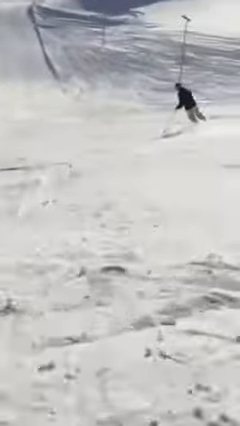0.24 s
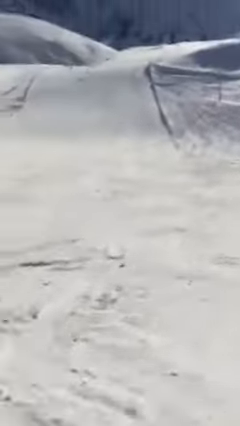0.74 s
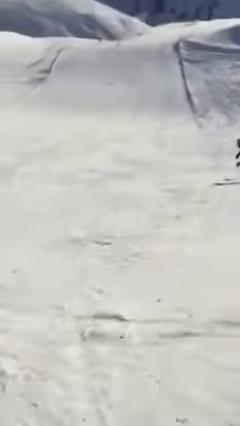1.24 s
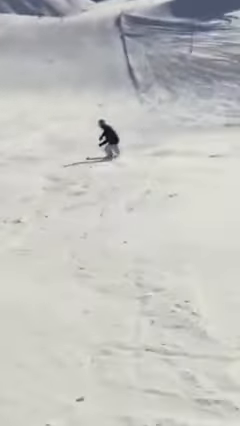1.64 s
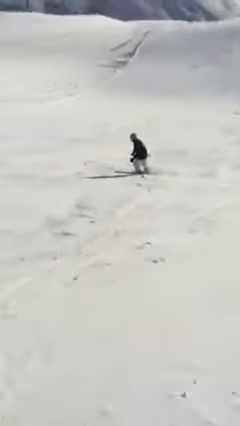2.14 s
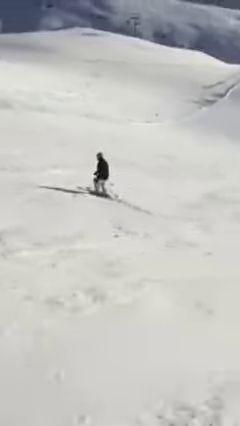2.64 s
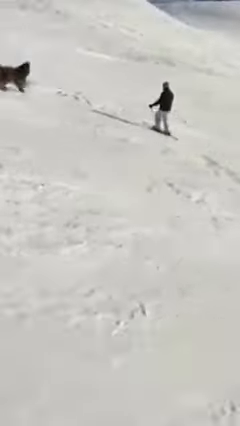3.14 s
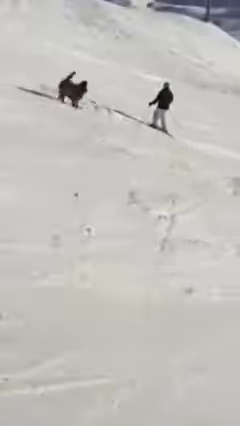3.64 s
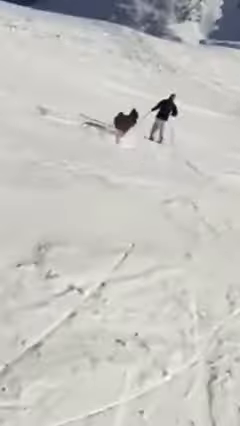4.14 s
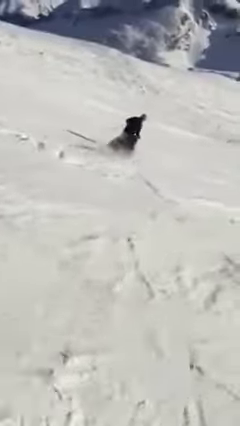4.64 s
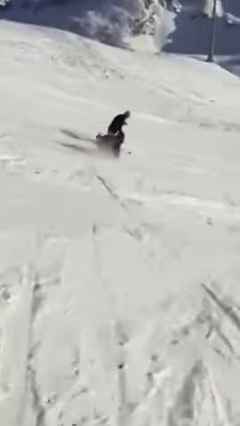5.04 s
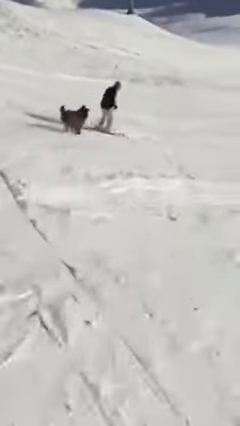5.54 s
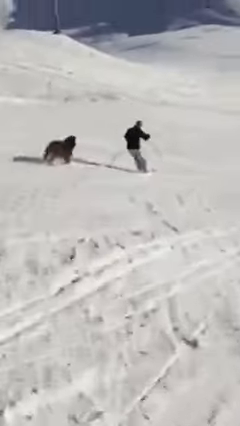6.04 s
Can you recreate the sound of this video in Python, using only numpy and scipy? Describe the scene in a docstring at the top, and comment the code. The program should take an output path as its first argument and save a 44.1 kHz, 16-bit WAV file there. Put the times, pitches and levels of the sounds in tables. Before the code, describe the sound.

Skis glide down a packed snow slope, their edges scraping through uneven turns with a gritty rasp and a hiss of thrown snow. The skis clack together sharply about a second in, and one slaps down dully near the middle. The scraping then grows stronger before easing. Low wind gusts buffet the moving skier's phone microphone, mostly at the start and near the end.

```python
"""Skiing on packed snow.

A skier, phone in hand, turns and skids down a piste. The edges crush grains and ring the skis,
loose snow sprays, the bases drum over ruts. Wind buffets the single microphone in gusts.
The skis clack together at 1.1 s; one ski slaps down at 2.9 s."""
import sys
import numpy as np
from scipy import signal
from scipy.fft import rfft, irfft, next_fast_len
from scipy.io import wavfile
from scipy.ndimage import uniform_filter1d

SR = 44100
rng = np.random.default_rng(int(sys.argv[2]) if len(sys.argv) > 2 else 0)


def bounce(signal):
    """Save signal as a 16-bit WAV file at the path given by the first command-line argument."""
    frames = np.transpose(np.atleast_2d(signal))
    limited = np.clip(frames, -1, 1)
    pcm = np.round(limited * 32767).astype(np.int16)
    wavfile.write(sys.argv[1], SR, pcm)


N = 276948
TIME = np.arange(N) / SR

# Resonances of skis and boots. Each row: centre in Hz, width in Hz, added peak in dB.
SKI_RESONANCES = [(320, 120, -22.5), (912, 160, -6.5), (1440, 88, -7.5), (2522, 43, -7), (4000, 65, -11.5),
                  (8760, 770, -18)]


def undb(db):
    """Decibels to gain."""
    return np.exp(np.asarray(db) * (np.log(10) / 20))


def unit(x):
    """Scale to rms 1."""
    return x / np.sqrt(np.mean(x ** 2))


def curve(points):
    """Per-sample curve through (seconds, value) points, corners rounded."""
    return uniform_filter1d(np.interp(TIME, *np.transpose(points)), size=600)


def walk(per_s):
    """Random levels joined by straight lines."""
    return np.interp(TIME * per_s, np.arange(N // 10), rng.standard_normal(N // 10))


def swell(start_s, end_s, rise_s, fall_s):
    """Envelope: smooth rise, hold, exponential fall."""
    rise = np.sin(np.pi / 2 * np.clip((TIME - start_s) / rise_s, 0, 1))
    return rise * np.exp(-np.maximum(TIME - end_s, 0) / fall_s)


def bursts(blows, rise_s):
    """Envelope of blows that rise fast and die away."""
    envelope = np.zeros(N)
    for start_s, db, decay_s in blows:
        start = int(start_s * SR)
        age = TIME[:min(N - start, SR // 2)]
        envelope[start:start + len(age)] += undb(db) * (1 - np.exp(-age / rise_s)) * np.exp(-age / decay_s)
    return envelope


def colour(x, spectrum, resonances=()):
    """Minimum-phase filter of unit power gain: smooth spectrum with resonant peaks."""
    size = 2 * next_fast_len(N)
    bin_hz = np.maximum(np.arange(size // 2 + 1) * SR / size, 1)
    hz, db = np.transpose(spectrum)
    gain = undb(np.interp(np.log(bin_hz), np.log(hz), db))
    for centre_hz, width_hz, peak_db in resonances:
        gain *= 1 + undb(peak_db) / (1 + (2 * (bin_hz - centre_hz) / width_hz) ** 2)
    cepstrum = irfft(np.log(unit(gain)))
    cepstrum[1:size // 2] *= 2
    cepstrum[size // 2 + 1:] = 0
    return irfft(rfft(x, size) * np.exp(rfft(cepstrum)))[:N]


def grains(per_s, spread_db):
    """Snow crystals break: dense clicks, mostly small, a few large."""
    size = undb(spread_db * np.minimum(rng.exponential(size=N), 6))
    return unit((rng.random(N) < per_s / SR) * size * rng.choice([-1, 1], N))


def crumble(per_s, decay_s):
    """Snow gives way in steps: jumps of force that decay, rms 1."""
    steps = (rng.random(N) < per_s / SR).astype(float)
    force = signal.lfilter([1], [1, -np.exp(-1 / (decay_s * SR))], steps)
    return unit(force - force.mean())


def patchy(x, depth_db):
    """The contact moves along the ski: narrow resonances swell and fade in tens of milliseconds."""
    spectra = signal.stft(x, nperseg=512)[2]
    patches = uniform_filter1d(rng.standard_normal(spectra.shape), size=3, axis=0)
    patches = unit(uniform_filter1d(patches, size=9, axis=1))
    return signal.istft(spectra * unit(undb(depth_db * patches)), nperseg=512)[1][:N]


def edging():
    """Carve, skid and spray amplitudes: steady glide plus edge strokes, summed as powers."""
    # Hiss of the flat bases, louder with speed. Each row: time in seconds, level in dB.
    glide = [(0, -40.5), (.25, -30.5), (.6, -37.5), (.85, -34.5), (1.05, -35.5), (1.17, -31.5), (1.68, -32),
             (2.3, -34.5), (2.55, -35.5), (2.7, -39), (2.88, -38.5), (3.0, -31.5), (3.68, -28.5),
             (4.4, -28.5), (5.1, -37.5), (5.8, -32.5), (6.28, -36)]
    # Skis set on edge to turn or brake. Each row: start and release in seconds, level in dB,
    # spray relative to that level in dB, skid relative to carve in dB.
    strokes = [ (0.049, 0.098, -35.5, 1, 3), (0.136, 0.254, -28.5, -19, 1), (0.28, 0.55, -30, -2.5, -1),
               (0.618, 0.658, -38, 4, 3), (0.716, 0.729, -26.5, -7, 1), (1.196, 1.288, -22, -11, -9),
               (1.302, 1.365, -20.5, -6, -11.5), (1.427, 1.584, -25.5, -13, -6),
               (1.727, 1.82, -22.5, -1.5, -8), (1.794, 1.86, -17, -4.5, -10.5),
               (1.86, 1.952, -21.5, -6, -10.5), (1.974, 2.113, -19.5, -2.5, -5.5),
               (2.15, 2.388, -30.5, -12, -6), (2.58, 2.6, -26, -12.5, -11), (2.947, 3.01, -24, -7, -1.5),
               (3.027, 3.17, -26.5, -2, -4), (3.246, 3.332, -24.5, -2.5, 0),
               (3.347, 3.442, -22, -1.5, -7.5), (3.425, 3.537, -21.5, 1.5, -5.5),
               (3.596, 3.662, -28, -13, 4), (3.752, 4.06, -16.5, -1.5, -3), (4.03, 4.298, -20.5, -4.5, -2),
               (4.295, 4.444, -19, -3.5, -4.5), (4.46, 4.648, -24.5, -9, -0.5), (4.667, 4.98, -23, -11, -2),
               (5.147, 5.29, -26.5, -0.5, -5.5), (5.312, 5.447, -28.5, -2.5, -4),
               (5.52, 5.589, -28, -4.5, -3), (5.788, 5.858, -23, -2.5, -2.5), (5.9, 5.993, -26, -13, -13),
               (6.164, 6.278, -25.5, -2.5, -11), ]
    sag_db_per_s, cruise_db, glide_skid_db = 4.5, -35, -4
    glide_db = curve(glide)
    glide_spray_db = -1 + 0.64 * (glide_db - cruise_db)  # more speed, more spray
    parts = [(undb(glide_db), glide_spray_db, glide_skid_db)]
    for start_s, end_s, db, spray_db, skid_db in strokes:
        held_s = end_s - start_s
        shape = swell(start_s, end_s, rise_s=0.0076 + 0.31 * held_s, fall_s=0.022 + 0.3 * held_s)
        sag_db = sag_db_per_s * np.clip(TIME - start_s - held_s / 2, -held_s, held_s)
        parts.append((shape * undb(db - sag_db), spray_db, skid_db))
    carve = slide = throw = 0
    for force, spray_db, skid_db in parts:
        power, slip = force ** 2, undb(skid_db) ** 2
        carve += power / (1 + slip)
        slide += power * slip / (1 + slip)
        throw += power * undb(spray_db) ** 2
    return np.sqrt([carve, slide, throw])


def scrape(force):
    """A carving edge crushes grains and rings the ski."""
    # Carving spectrum. Each row: frequency in Hz, relative density in dB.
    spectrum = [(300, -25.5), (700, -23), (1100, -5), (1500, 0.5), (2100, 0.5), (2700, -3), (3100, -7.5),
                (4200, -14.5), (7000, -27), (11000, -65)]
    force = force * undb(0.78 * crumble(per_s=35, decay_s=0.013))
    crunch = grains(per_s=6000, spread_db=2.0) * force
    return patchy(colour(crunch, spectrum, SKI_RESONANCES), depth_db=3.0)


def skid(force):
    """An edge slides sideways over the grains: a lower, smoother rasp."""
    # Skid spectrum. Each row: frequency in Hz, relative density in dB.
    spectrum = [(250, -23.5), (470, -7.5), (620, -2.5), (900, -4), (1150, -2), (1600, -6.5), (3000, -47)]
    force = force * undb(1.17 * crumble(per_s=35, decay_s=0.018))
    rasp = grains(per_s=4500, spread_db=0.44) * force
    return patchy(colour(rasp, spectrum, SKI_RESONANCES), depth_db=2.0)


def spray(force):
    """Thrown snow hisses; its colour shifts as the phone swings round."""
    # Spray spectra for two phone headings. Each row: frequency in Hz, relative density in dB.
    ahead_spectrum = [(1200, -27), (2800, -1), (3600, -6.5), (4100, -13), (4900, -2.5), (5500, 0.5),
                      (6500, 4.5), (7500, 1.5), (9000, -3.5), (10000, -2), (11000, -31.5)]
    turned_spectrum = [(1200, -19), (3000, -1), (3600, 4), (4500, 5), (4950, 1), (5500, 1), (6300, 1),
                       (7500, -15), (9000, -5), (10000, -12), (11000, -34)]
    # Swing of the phone. Each row: time in seconds, share of the turned spectrum from 0 to 1.
    swing = [(2.4, 0.53), (3.0, 0.74), (5.2, 0.66), (6.0, 0.6)]
    share = curve(swing)
    crystals = grains(per_s=16000, spread_db=2.5) * force
    ahead = colour(crystals * (1 - share), ahead_spectrum, SKI_RESONANCES)
    turned = colour(crystals * share, turned_spectrum, SKI_RESONANCES)
    return patchy(ahead + turned, depth_db=2.5)


def drum(load_db):
    """The bases knock over rutted snow."""
    # Rut drumming. Each row: time in seconds, level before load in dB.
    ruts = [(0, -52), (.12, -50), (.19, -39.5), (.62, -42), (.83, -37.5), (.9, -32.5), (1.1, -35.5),
            (1.42, -47), (1.55, -33), (1.89, -34), (2.3, -41.5), (2.72, -47), (3.0, -36.5), (4.42, -31.5),
            (4.62, -41), (4.8, -38), (5.4, -44.5), (6.28, -44.5)]
    # Drumming spectrum. Each row: frequency in Hz, relative density in dB.
    spectrum = [(50, -30), (115, -9.5), (180, -2.5), (290, 0.5), (400, -3.5), (520, -9), (1000, -16),
                (2000, -27)]
    knocks = grains(per_s=2600, spread_db=1.9)
    level_db = curve(ruts) + load_db + 1.6 * walk(per_s=16)
    return colour(knocks * undb(level_db), spectrum, SKI_RESONANCES)


def skis():
    """Four contact sounds under one load, shaken by uneven ground."""
    # Load changes, mostly the skier rising. Each row: centre and half length in seconds, gain in dB.
    lifts = [(.61, 0.023, -3), (1.673, 0.026, -3), (2.433, 0.014, -4.5), (2.696, 0.053, -4.5),
             (2.922, .01, -6), (3.203, 0.045, -2), (3.597, 0.023, -5.5), (3.669, 0.015, -8),
             (5.138, 0.024, 2), (6.11, 0.058, 0)]
    # An edge bites crust or a lump. Each row: start in seconds, level in dB, decay in seconds.
    bites = [(.165, -27, 0.025), (1.249, -28, .025), (1.803, -19, .005), (2.213, -24, 0.01),
             (2.931, -25.5, .014), (3.252, -19, .006), (3.316, -15, 0.0077), (3.384, -23, .002),
             (3.484, -17, 0.0025), (5.255, -23, 0.017), (5.416, -21, .009), (5.695, -22, 0.0052),
             (5.749, -23.5, 0.044), (5.939, -23.5, 0.014), (6.193, -24, 0.036)]
    carve, slide, throw = edging()
    lift_db = sum(db * np.exp(-((TIME - centre_s) / half_s) ** 2) for centre_s, half_s, db in lifts)
    ground_db = 0.5 * walk(per_s=32) + 0.82 * crumble(per_s=75, decay_s=0.0086)
    load = undb(lift_db + ground_db)
    bite = bursts(bites, rise_s=0.0007)

    def force(steady, steady_db, bite_db):
        return np.hypot(steady * load * undb(steady_db), bite * undb(bite_db))

    return (scrape(force(carve, steady_db=0.1, bite_db=-0.5))
            + skid(force(slide, steady_db=0.5, bite_db=-7))
            + spray(force(throw, steady_db=1.0, bite_db=-2))
            + drum(load_db=2.15 + 0.66 * lift_db + ground_db))


def wind():
    """Turbulence rumbles at the microphone port; each large eddy adds a short thump."""
    # Airflow between gusts. Each row: time in seconds, level in dB.
    airflow = [(0, -37.5), (1.6, -46), (2.2, -49.5), (2.4, -50), (3.0, -49), (4.15, -48), (4.7, -57),
               (5.8, -51.5), (6.0, -73), (6.28, -35)]
    # Gusts. Each row: start and end in seconds, level in dB.
    gusts = [(0, 0.08, -27), (.11, 0.138, -24), (0.308, .41, -39), (0.447, 0.518, -27.5), (0.75, 0.84, -35),
             (0.867, 1.05, -35), (1.133, 1.147, -33), (1.287, 1.31, -38), (1.845, 1.884, -40),
             (2.02, 2.08, -39), (4.855, 4.91, -22.5), (4.957, 5.106, -26.5), (5.131, 5.224, -24),
             (5.24, 5.279, -34), (5.593, 5.64, -41), (5.82, 5.86, -45)]
    eddies_per_s, eddy_hz, eddy_half_s = 16, 70.4, 0.018
    strength = undb(curve(airflow))
    for start_s, end_s, db in gusts:
        strength = np.hypot(strength, undb(db) * swell(start_s, end_s, rise_s=0.0047, fall_s=0.011))
    # Rumble spectrum. Each row: frequency in Hz, relative density in dB.
    spectrum = [(22, -28), (32, -16), (45, -2.5), (65, 1), (95, -4), (140, -3.5), (250, -29.5),
                (600, -36.5)]
    rumble = unit(colour(rng.standard_normal(N), spectrum)) * undb(-3.5 + 2.0 * walk(per_s=30))
    thumps = np.zeros(N)
    swirl_cycles = 0.12 * walk(per_s=130)
    for k, (late, size, pitch, phase) in enumerate(rng.random((int(eddies_per_s * N / SR), 4))):
        age = TIME - (k + late) / eddies_per_s
        near = np.abs(age) < 4 * eddy_half_s
        hz = eddy_hz * 2 ** (0.7 * (pitch - 0.5))
        cycles = hz * age[near] + swirl_cycles[near] + phase
        envelope = undb(2.5 + 13 * (size - 0.5)) * np.exp(-(age[near] / eddy_half_s) ** 2)
        thumps[near] += envelope * np.sin(2 * np.pi * cycles)
    microphone_low_cut = signal.butter(5, 38, "high", fs=SR, output="sos")
    return signal.sosfilt(microphone_low_cut, strength * (rumble + thumps))


def ring(start_s, hz, db, t60_s):
    """One decaying mode of a struck ski."""
    tone, age, start = np.zeros(N), TIME[:SR // 4], int(start_s * SR)
    tone[start:start + len(age)] = undb(db) * np.sin(2 * np.pi * hz * age) * 1000 ** (-age / t60_s)
    return tone


def clack():
    """Hard edges chatter together: each contact cracks and rings, then the whole ski flexes."""
    # Ski-on-ski contacts. Each row: start in seconds, level in dB.
    contacts = [(1.1102, -3), (1.1123, -3), (1.1137, -2), (1.1166, -3), (1.1181, -2), (1.1201, -5)]
    # Ski modes. Each row: frequency in Hz, relative level in dB, t60 in seconds.
    modes = [(334, -17, .045), (885, -14, .028), (1086, -14, .028), (1352, -9, .018), (1790, -9, .02),
             (2178, -11, .045), (2443, -12, .025), (2608, -11, .022), (3975, -11, .012), (5590, -17, .008),
             (6790, -17, .008)]
    # Crack spectrum. Each row: frequency in Hz, relative density in dB.
    spectrum = [(200, -35), (900, 1.5), (2000, 2), (3500, -4.5), (5000, -12), (9000, -13.5), (11000, -21)]
    force = bursts([(start_s, db, 0.0011) for start_s, db in contacts], rise_s=0.0001)
    crack = undb(-0.3) * colour(force * rng.standard_normal(N), spectrum)
    # Each contact hits another spot, so mode strength and sign vary.
    rings = sum(undb(db) * rng.uniform(-0.85, 1) * ring(start_s, *mode)
                for start_s, db in contacts for mode in modes)
    flex = ring(start_s=1.1225, hz=82, db=-14.5, t60_s=0.08)
    return crack + rings + flex


def slap():
    """The flat of a ski lands on packed snow with a dull double knock."""
    # Landing, tail then tip. Each row: start in seconds, relative level in dB.
    contacts = [(2.8945, -15.5), (2.902, -11), (2.9072, -17), (2.913, -23)]
    # Slap spectrum. Each row: frequency in Hz, relative density in dB.
    spectrum = [(100, -12), (300, -6.5), (600, -2), (950, 1.5), (1600, -4), (2500, -12.5), (5000, -17),
                (10000, -33)]
    force = bursts([(start_s, db, 0.0035) for start_s, db in contacts], rise_s=0.00036)
    return undb(1.0) * colour(force * rng.standard_normal(N), spectrum)


def scene():
    """One microphone, the same in both channels."""
    return np.tile(skis() + wind() + clack() + slap(), (2, 1))


def record(dry):
    """The phone rounds off the loudest peaks and cuts the top."""
    ceiling, knee, top_hz = 0.82, 4, 10650
    rounded = dry / (1 + np.abs(dry / ceiling) ** knee) ** (1 / knee)
    low_pass = signal.firwin(221, top_hz, window=("kaiser", 8), fs=SR)
    return signal.fftconvolve(rounded, low_pass[None], mode="same", axes=1)


dry = scene()
out = record(dry)
bounce(out)
```